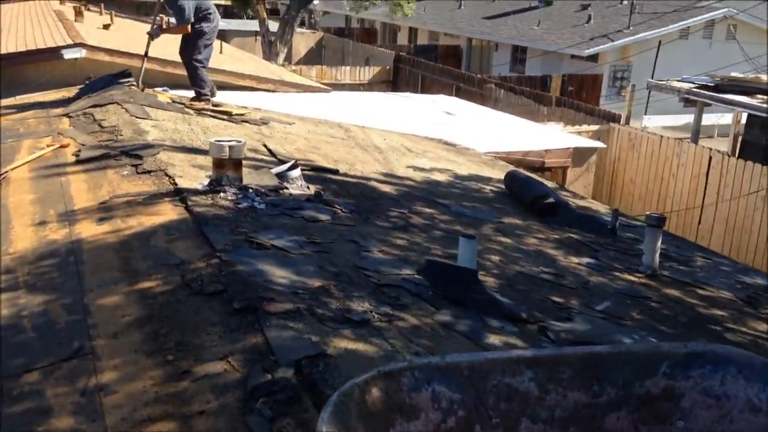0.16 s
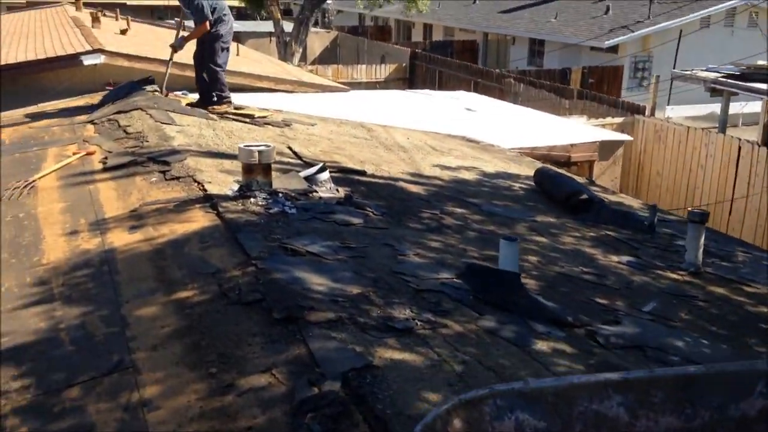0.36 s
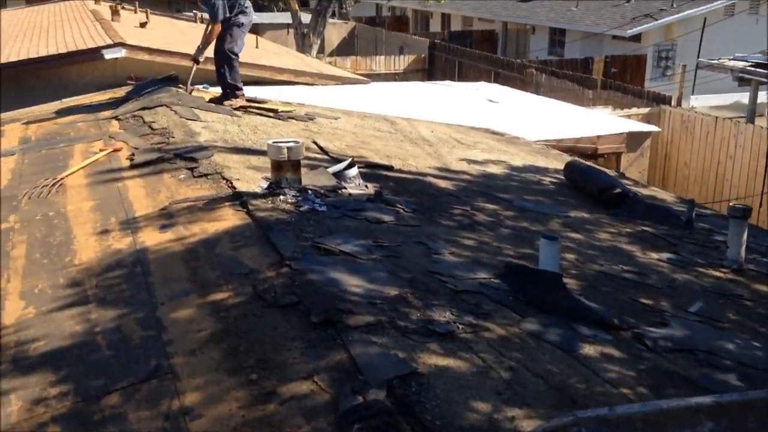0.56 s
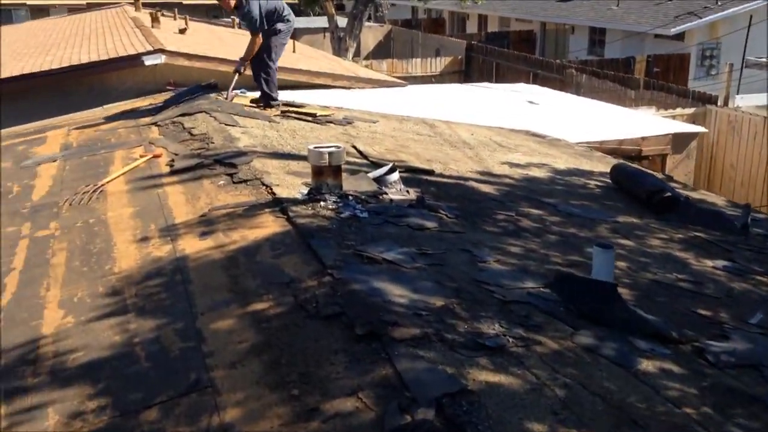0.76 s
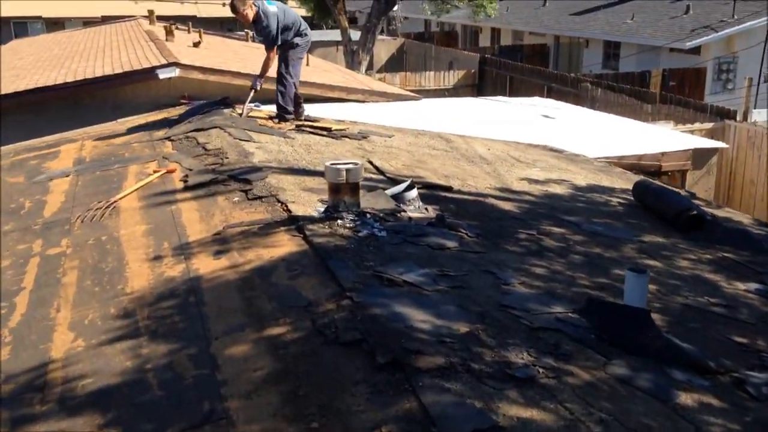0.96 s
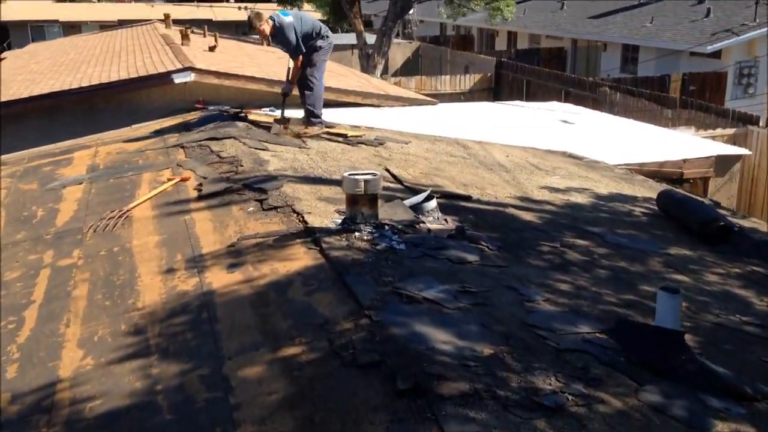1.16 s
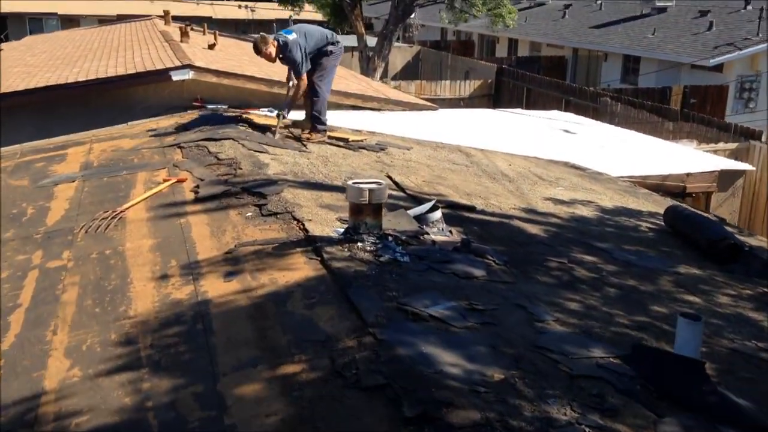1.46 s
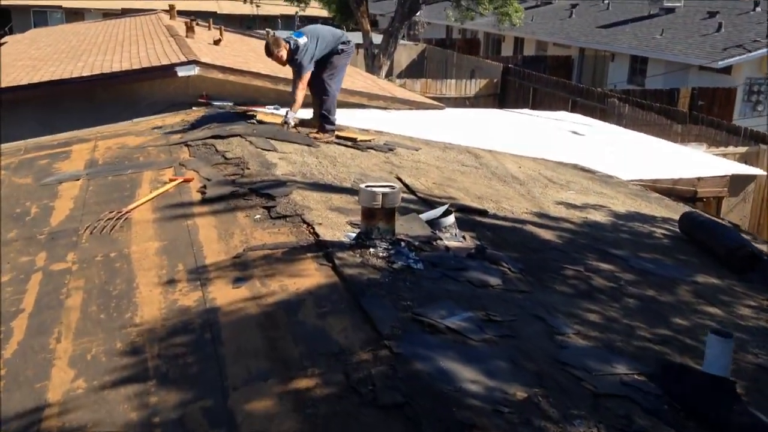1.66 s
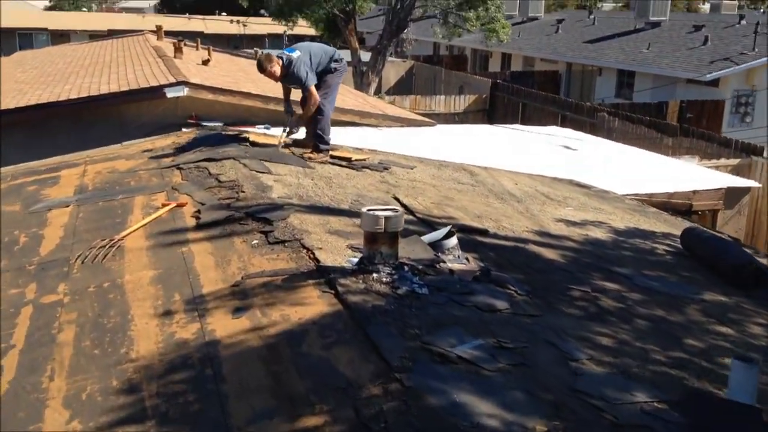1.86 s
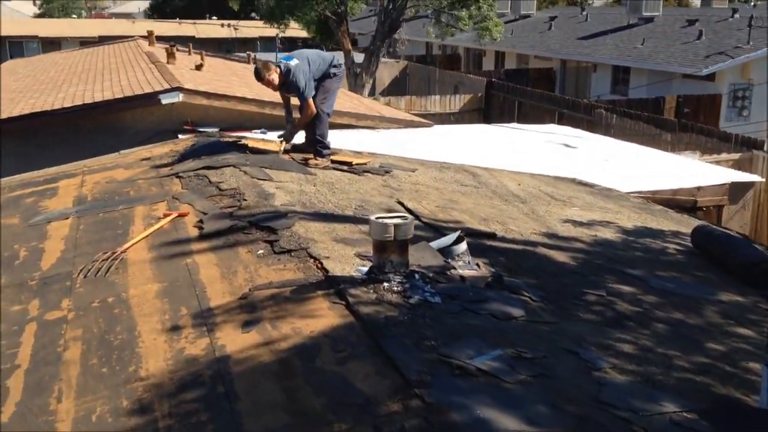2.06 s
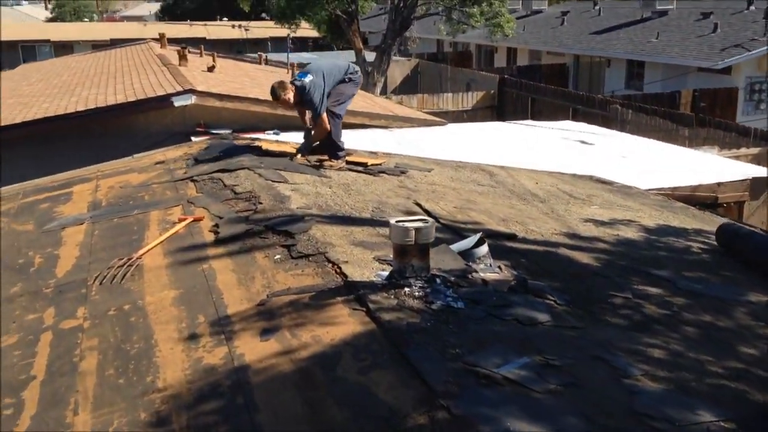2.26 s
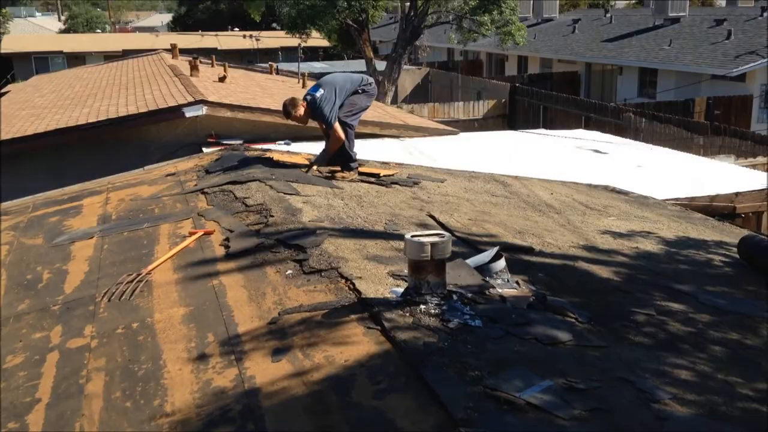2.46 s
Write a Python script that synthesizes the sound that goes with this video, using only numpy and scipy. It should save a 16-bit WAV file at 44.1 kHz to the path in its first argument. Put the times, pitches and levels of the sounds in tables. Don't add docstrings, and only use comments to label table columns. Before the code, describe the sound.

Heavy blows boom on a hollow wooden roof as a worker strips shingles, with gritty crunches, then a short jerky shovel scrape and scattered debris ticks, outdoors near a small microphone over faint distant traffic wash.

```python
import sys
import numpy as np
from scipy import signal
from scipy.fft import rfft, irfft
from scipy.io import wavfile
from scipy.ndimage import uniform_filter1d

SR = 44100
rng = np.random.default_rng(int(sys.argv[2]) if len(sys.argv) > 2 else 0)


def natural_amplitude(level_db):
    exponent = np.asarray(level_db, float) / 20
    return 10 ** exponent


def wav_record(signal):
    frames = np.transpose(np.atleast_2d(signal))
    bounded = np.clip(frames, -1, 1)
    quanta = np.round(bounded * 32767).astype(np.int16)
    wavfile.write(sys.argv[1], SR, quanta)


N = 114660

# time in seconds, level in dB.
RUMBLE = [(0, -52), (.3, -43.5), (.6, -47), (1.1, -47.5), (1.7, -48), (1.9, -55), (2.6, -56.5)]


def evened(x):
    return x / np.sqrt(np.mean(x ** 2) + 1e-20)


def read(points, hz):
    f_hz, value = np.transpose(points)
    return np.interp(np.log(hz + 1), np.log(f_hz + 1), value)


def add(mix, start_s, sound):
    part = mix[round(start_s * SR):][:len(sound)]
    part += sound[:len(part)]


def thud(level_db, deck_hz, t60_s, knock_db, dip_s):
    # frequency in Hz, level in dB, share of the ring time.
    deck_modes = [(194.4, 1, 0.42), (228, -6, 0.32), (390, -19, 0.62), (406, -5.5, 0.28), (505, -6, 0.2),
                  (745, -13, 0.29), (920, -29, 0.6), (1154, -24, 0.18)]
    contact_s = 0.00083
    t = np.arange(0, 0.4, 1 / SR)
    ring = natural_amplitude(-60 * t / t60_s) * np.sin(2 * np.pi * deck_hz * t)
    for mode_hz, mode_db, share in deck_modes:
        decay_db = -60 * t / (t60_s * share)
        ring += natural_amplitude(knock_db + mode_db + decay_db) * np.sin(2 * np.pi * mode_hz * t)
    dip = -natural_amplitude(-2) * np.sin(np.pi * np.arange(0, dip_s, 1 / SR) / dip_s)
    cutoff = min(natural_amplitude(knock_db / 2) / (contact_s * SR / 2), 0.5)
    b, a = signal.bessel(4, cutoff, norm="mag")
    return natural_amplitude(level_db) * signal.lfilter(b, a, np.concatenate([dip, ring]))


def deck_blows():
    # start in seconds, level in dB, deck pitch in Hz, ring t60 in seconds, hard knock in dB.
    blows = [(.061, -29.5, 137, 0.1, -39.5), (0.083, -41, 131, 0.21, -19.5), (0.2485, -20, 104, 0.21, 2.5),
             (.258, -19.5, 99, 0.15, -1), (0.345, -32.5, 111, 0.06, -5), (0.434, -29, 95, 0.037, -5.5),
             (0.4435, -20, 145, 0.032, -8.5), (.453, -37, 230, .06, -20.5),
             (0.465, -26, 85.3, 0.084, -14.5), (0.492, -31, 94, 0.056, -7.5), (.504, -28.5, 71, 0.12, -14),
             (0.519, -42, 92, 0.09, 1.5), (0.624, -40.5, 77, 0.16, -5), (.7395, -26, 154, 0.14, -16.5),
             (0.9308, -36.5, 96, 0.13, -9.5), (1.009, -38.5, 105, 0.083, -5),
             (1.2303, -23.5, 127.6, 0.11, -11), (1.275, -35.5, 67.6, 0.19, -17.5),
             (1.337, -31.5, 79, 0.17, -21), (1.691, -41.5, 170.5, 0.21, 5.5),
             (1.762, -24.5, 86, 0.062, -16.5), (1.774, -27, 104, 0.052, -26), (1.6, -36, 80, 0.21, -29.5),
             (1.711, -37, 282, 0.059, -16), (2.25, -47, 193.5, 0.088, -26), (2.27, -43, 79, 0.076, -19)]
    out, dip_s = np.zeros(N), 0.0026
    for start_s, level_db, deck_hz, t60_s, knock_db in blows:
        add(out, start_s - dip_s + 0.00089, thud(level_db, deck_hz, t60_s, knock_db, dip_s))
    return out


def grains(colour, lo_hz, hi_hz, cycles, per_s, clump_db, count):
    size = natural_amplitude(1.5 * np.minimum(rng.exponential(1, N), 4)) * (rng.random(N) < per_s / SR)
    kind = rng.integers(0, count, N)
    knots = np.arange(0, N, 300)
    out = np.zeros(N)
    for k, hz in enumerate(np.geomspace(lo_hz, hi_hz, count)):
        turns = np.arange(800) * hz / SR
        ring = cycles * (2.6 if k % 3 == 0 else 1)
        snap = turns / ring * np.exp(-2 * turns / ring) * np.sin(2 * np.pi * turns)
        snap *= natural_amplitude(read(colour, hz)) * np.sqrt(hz) / np.linalg.norm(snap)
        clumps = natural_amplitude(clump_db * np.interp(np.arange(N), knots, rng.standard_normal(len(knots))))
        out += signal.oaconvolve(size * clumps * (kind == k), snap)[:N]
    return evened(out)


def crunch_power():
    # start in seconds, level in dB, rise in seconds, t60 in seconds, bright share in dB.
    bursts = [(0.059, -63.5, 0.0079, 0.3, -7), (0.2525, -34.5, 0.0069, 0.1, -18.5),
              (0.267, -35, 0.015, 0.28, -21.5), (0.422, -54, 0.0038, 0.067, -7),
              (0.4342, -48, 0.0022, 0.068, -13), (0.449, -58.5, 0.016, 0.41, -18),
              (0.641, -54, 0.0064, 0.089, -27), (0.736, -54.5, 0.021, 0.09, -7),
              (.93, -63, 0.014, 0.031, -4), (1.02, -59, 0.012, 0.3, -10), (1.1, -55.5, 0.12, .2, -8),
              (1.182, -47, 0.0044, 0.085, -8.5), (1.205, -48, 0.011, 0.1, -13),
              (1.225, -39.5, 0.016, 0.056, -12), (1.25, -59, 0.0072, 0.79, -3),
              (1.327, -51, 0.02, 0.24, -5.5), (1.796, -57, 0.011, 1, -8.5),
              (1.927, -55.5, 0.011, 0.41, -4.5), (1.988, -56, 0.032, 1, -7), (2.059, -50, 0.014, 0.12, -13),
              (2.201, -59, 0.009, 0.31, -6.5), (2.537, -58.5, 0.0056, 0.046, -1),
              (2.55, -57.5, 0.012, 0.18, -5)]
    t, dull, bright = np.arange(N) / SR, np.zeros(N), np.zeros(N)
    for start_s, level_db, rise_s, t60_s, bright_db in bursts:
        u = np.maximum(t - start_s, 0)
        swell = np.sqrt(np.minimum(u / rise_s, 1))
        fade_db = -60 * np.maximum(u - rise_s, 0) / t60_s
        dull += (swell * natural_amplitude(level_db + fade_db)) ** 2
        bright += (swell * natural_amplitude(level_db + bright_db + 1.1 * fade_db)) ** 2
    return dull, bright


def scrape_power():
    # time in seconds, effort in dB, bright share in dB.
    strokes = [
        (1.401, -65, -7.5),
        (1.5, -50, -10.5),
        (1.546, -48.5, 2),
        (1.589, -41.5, -2.5),
        (1.624, -33, -7.5),
        (1.65, -43, -5),
        (1.692, -38, -12.5),
        (1.727, -51.5, -9),
        (1.783, -62, -7.5),
    ]
    # time in seconds, extra dull in dB, extra bright in dB, length in seconds.
    slips = [(1.559, 2, 12.5, 0.0033), (1.545, 3, 1, .003), (1.576, 2, 5, .003), (1.603, 1, 5, .004),
             (1.608, -9, 2, .003), (1.614, 1.5, 7, .002), (1.622, 3.5, 7, 0.0041), (1.649, 2, 4, 0.0018),
             (1.663, 1.5, 1.5, 0.0042), (1.677, -0.5, 1, 0.0033), (1.697, 4, -4, 0.0057)]
    t = np.arange(N) / SR
    s, effort_db, bright_db = np.transpose(strokes)
    effort_db = np.interp(t, s, effort_db, -120, -120)
    bright_db = np.interp(t, s, bright_db)
    dull_jolt_db, bright_jolt_db = np.zeros(N), np.zeros(N)
    for slip_s, dull_db, extra_bright_db, length_s in slips:
        bump = np.exp(-((t - slip_s) / length_s) ** 2)
        dull_jolt_db += dull_db * bump
        bright_jolt_db += extra_bright_db * bump
    return natural_amplitude(effort_db + dull_jolt_db) ** 2, natural_amplitude(effort_db + bright_jolt_db + bright_db) ** 2


def blade(x):
    # frequency in Hz, level in dB, width in Hz.
    blade_modes = [(1940, -25.5, 32), (2390, -5, 42), (2866, 1, 35), (3235, -1.5, 46), (3730, -5.5, 87),
                   (4123, -6, 46)]
    out = x.copy()
    for hz, level_db, width_hz in blade_modes:
        out += natural_amplitude(level_db) * signal.lfilter(*signal.iirpeak(hz, hz / width_hz, SR), x)
    return out


def grit():
    # frequency in Hz, level in dB per Hz.
    dull_colour = [(150, -12), (400, -8), (1000, -7), (2000, -1.5), (2800, 0), (4200, -5.5), (5200, -13),
                   (8000, -20.5)]
    bright_colour = [(3000, -9), (5000, -6.5), (8000, -6.5), (12000, -10.5), (15500, -13.5)]
    crunch_dull, crunch_bright = crunch_power()
    scrape_dull, scrape_bright = scrape_power()
    coarse = grains(dull_colour, 183.2, 7022, 3.62, 12000, clump_db=2.0, count=36)
    fine = grains(bright_colour, 4500, 14900, 2, 14000, clump_db=6.0, count=40)
    return blade(np.sqrt(crunch_dull + scrape_dull) * coarse) + np.sqrt(crunch_bright + scrape_bright) * fine


def tick(peak_db, hz, cycles):
    turns = np.arange(0, 0.08, 1 / SR) * hz
    envelope = (1 - np.exp(-4 * turns / cycles)) * np.exp(-turns / cycles)
    return natural_amplitude(peak_db) * envelope * 1.8 * np.sin(2 * np.pi * turns)


def stones_and_knocks():
    # start in seconds, peak in dB, pitch in Hz, decay in cycles.
    stones = [(.187, -41.5, 2300, .7), (.2478, -46, 4400, 2.2), (.761, -48, 8100, .8),
              (.862, -52, 9000, .8), (.907, -54.5, 5200, 1.6), (.994, -52, 8600, 1), (1.02, -53, 14000, 10),
              (1.111, -52, 10500, 3), (2.076, -35.5, 3900, 2), (.129, -47, 2400, 1.1),
              (2.014, -44, 10000, 1), (1.946, -45, 2500, 0.85), (2.488, -49, 4000, 1),
              (2.104, -47, 3000, 2), (2.115, -47, 3900, 1), (2.195, -50, 3400, 0.89),
              (2.037, -45, 3800, 1.8), (1.5565, -33, 6000, 2), (1.2305, -35.5, 2250, 5.6),
              (1.2415, -42, 4000, 11), (1.2435, -36, 2400, 7.6), (0.2862, -28, 2500, 15),
              (.403, -42.5, 13700, 10), (.4035, -27.5, 586, 0.2), (0.627, -36, 2400, 0.52),
              (.628, -56, 14000, 20), (.412, -51, 14600, 21), (1.112, -53, 13500, 8),
              (1.206, -50, 10700, 26), (1.2148, -42, 3000, 3), (1.327, -39, 2350, 1),
              (1.364, -27.5, 2500, 0.49), (1.376, -40, 4200, 1), (1.933, -35, 1100, 0.51),
              (2.0139, -32.5, 2800, 0.78), (1.996, -37.5, 5000, 0.76), (2.0647, -26, 2760, 1.6),
              (2.0799, -34, 3700, 2), (2.0843, -36.5, 2640, 2), (2.146, -44, 3500, 0.55),
              (2.211, -41, 7700, 0.97), (2.273, -34, 3800, 0.33), (2.2965, -33.5, 3200, 0.44),
              (2.35, -45, 12000, 2), (1.985, -40.5, 10400, 1.1), (2.5636, -38, 2300, 1.1)]
    knocks = [(.286, -50, 1560, 6.7), (.4365, -40, 1800, 2.4), (.2542, -24, 306, 1.14),
              (1.385, -47.5, 880, 2.8), (.477, -45.5, 1360, 6.4), (.513, -52, 930, 16),
              (.3, -45.5, 380, 12), (2.036, -45, 1620, 5), (1.536, -48, 2000, 9.1),
              (1.627, -32.5, 1720, 5.6), (1.663, -35, 1760, 9), (.7395, -32, 450, 0.95),
              (1.2375, -31, 289, 1.8), (1.243, -28, 720, 1), (1.625, -31, 860, 3.8), (1.689, -26, 1950, 5),
              (1.762, -38, 650, 1.45)]
    out = np.zeros(N)
    for start_s, peak_db, hz, cycles in stones + knocks:
        add(out, start_s, tick(peak_db, hz, cycles))
    return out


def strays():
    out = np.zeros(N)
    for when, size, pitch in rng.random((round(40 * N / SR), 3)):
        add(out, when * N / SR, tick(-62 + 12 * size ** 2, 2000 * 6 ** pitch, 1.16))
    return out


def echoes(x):
    t60_s, top_hz, level_db = 0.21, 3500, -17.5
    taps, at = np.zeros(SR // 2), np.arange(200, SR // 2 - 20, 20)
    taps[at + rng.integers(0, 20, len(at))] = rng.choice([-1., 1.], len(at))
    taps *= natural_amplitude(-60 * np.arange(SR // 2) / SR / t60_s)
    taps = signal.lfilter(*signal.butter(1, top_hz / (SR / 2)), taps)
    return natural_amplitude(level_db) * signal.fftconvolve(x, taps / np.linalg.norm(taps))[:N]


def rubs():
    # start in seconds, length in seconds, level in dB, resonance in Hz, width in Hz.
    drags = [
        (.45, 0.11, -56.5, 1920, 320),
        (.44, .11, -56.5, 1350, 1100),
        (.32, 0.048, -53, 2300, 300),
        (0.62, 0.084, -67, 3160, 250),
        (0.9, .06, -56, 850, 180),
        (2.1, .5, -77, 11600, 900),
    ]
    out, noise = np.zeros(N), rng.standard_normal(N)
    for start_s, length_s, level_db, hz, width_hz in drags:
        t = np.arange(0, length_s, 1 / SR)
        b, a = signal.iirpeak(hz, hz / width_hz, SR)
        band = evened(signal.filtfilt(b, a, noise))[round(start_s * SR) // 2:][:len(t)]
        add(out, start_s, natural_amplitude(level_db) * np.sqrt(np.sin(np.pi * t / length_s)) * band)
    return out


def rumble():
    centre_hz, width_hz = 69.4, 47
    hz = np.fft.rfftfreq(N, 1 / SR)
    s, level_db = np.transpose(RUMBLE)
    shape = 1 / (1 + ((hz - centre_hz) / width_hz) ** 2) * hz ** 2 / (hz ** 2 + 40 ** 2)
    hum = evened(irfft(rfft(rng.standard_normal(N)) * shape, N))
    return hum * natural_amplitude(np.interp(np.arange(N) / SR, s, level_db))


def wash():
    # frequency in Hz, level in dB per Hz.
    wash_colour = [(25, -59), (69, 5.5), (190, -1), (300, -7), (1000, -10.5), (4000, -26), (7000, -32),
                   (12000, -35.5), (15500, -34)]
    shuffle_share, shuffle_top_hz = 0.18, 2500
    frames, hz = N // 256 + 5, np.fft.rfftfreq(1024, 1 / SR)
    a, b, patches = rng.standard_normal((frames, 513, 3)).T
    patches = uniform_filter1d(patches, size=12, axis=0)
    patches = evened(uniform_filter1d(patches, size=10, axis=1))
    s, level_db = np.transpose(RUMBLE)
    footfall_db = np.interp(np.arange(frames) * 256 / SR, s, level_db - level_db[-1])
    swell_db = shuffle_share * np.outer(1 / (1 + (hz / shuffle_top_hz) ** 2), footfall_db)
    z = (a + 1j * b) * natural_amplitude(read(wash_colour, hz)[:, None] + 1.2 * patches + swell_db)
    return natural_amplitude(-52) * evened(signal.istft(z, nperseg=1024, noverlap=768)[1][:N])


def scene():
    work = deck_blows() + grit() + stones_and_knocks() + strays()
    return (work + echoes(work) + rubs() + rumble() + wash())[None]


def low_pass(x):
    return signal.sosfilt(signal.butter(12, 15920, fs=SR, output="sos"), x)


def record(dry):
    low_hz, top_hz = 48.3, 15450
    thin = signal.sosfilt(signal.butter(2, low_hz / (SR / 2), "high", output="sos"), dry)
    edge = signal.firwin(511, top_hz, window=("kaiser", 9), fs=SR)
    return low_pass(signal.oaconvolve(thin, edge[None], "same"))


dry = scene()
out = record(dry)
wav_record(out)
```